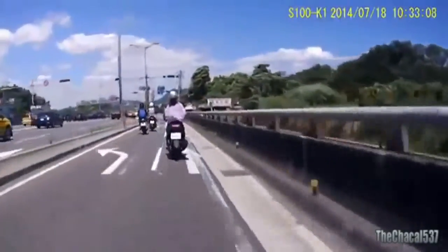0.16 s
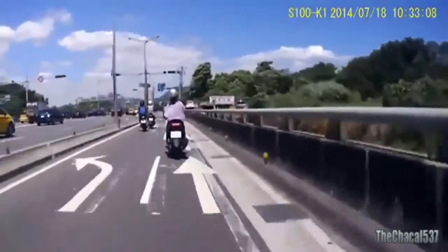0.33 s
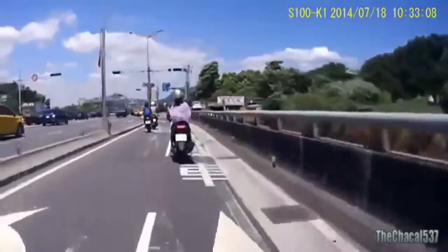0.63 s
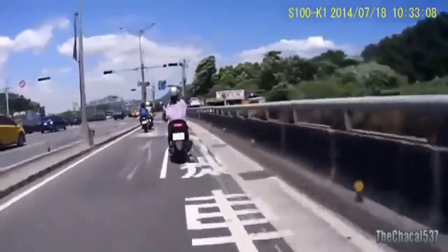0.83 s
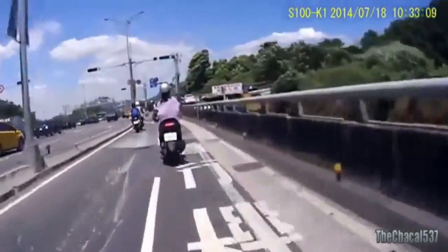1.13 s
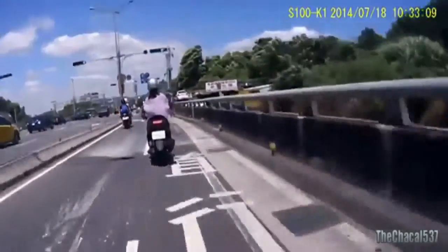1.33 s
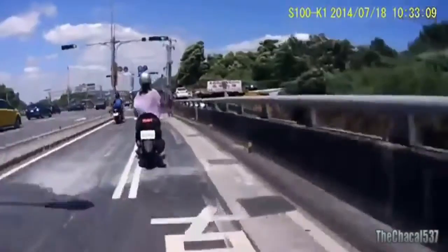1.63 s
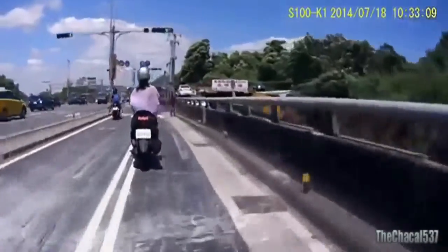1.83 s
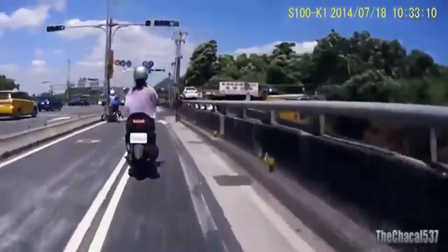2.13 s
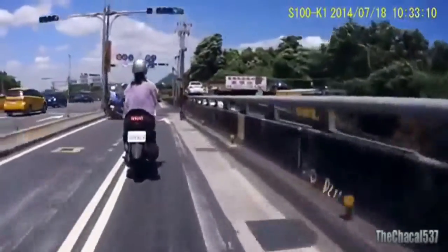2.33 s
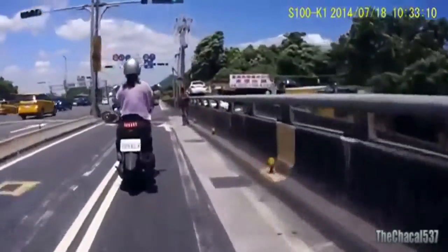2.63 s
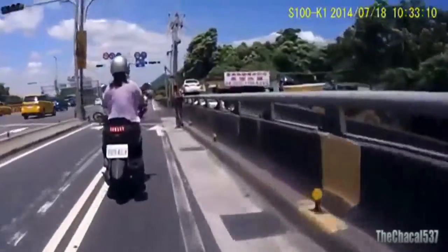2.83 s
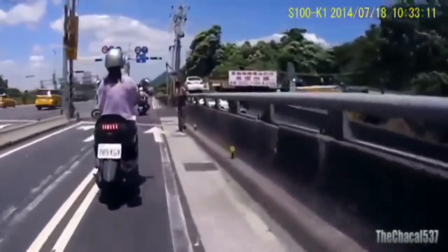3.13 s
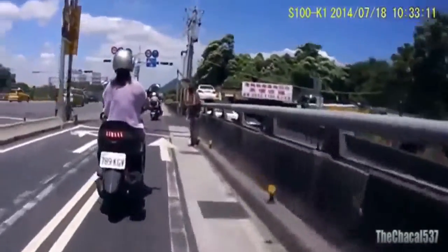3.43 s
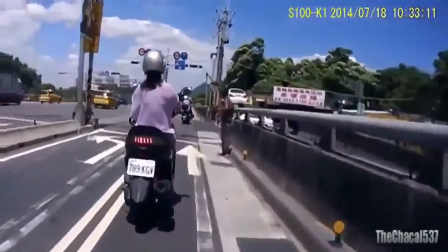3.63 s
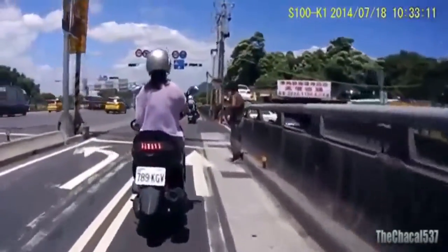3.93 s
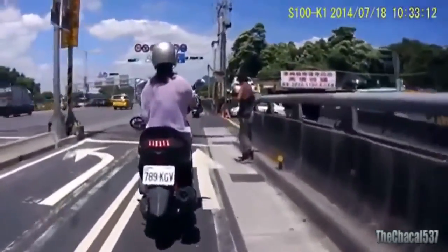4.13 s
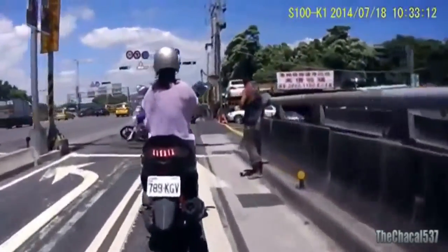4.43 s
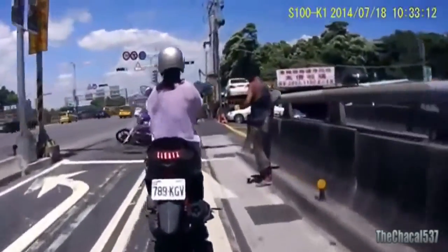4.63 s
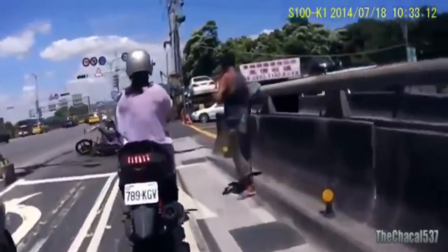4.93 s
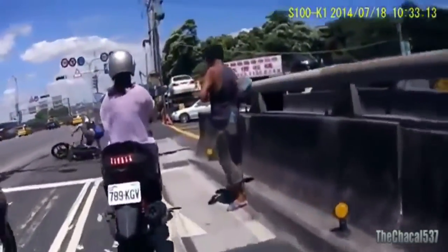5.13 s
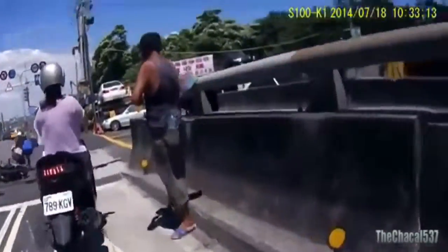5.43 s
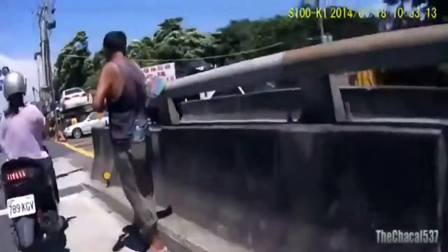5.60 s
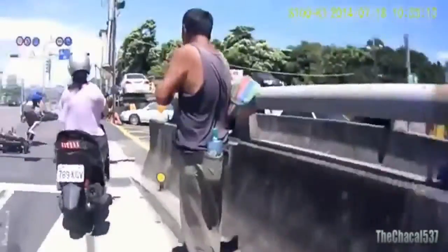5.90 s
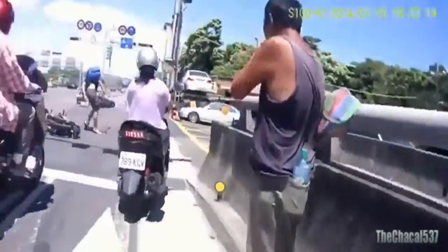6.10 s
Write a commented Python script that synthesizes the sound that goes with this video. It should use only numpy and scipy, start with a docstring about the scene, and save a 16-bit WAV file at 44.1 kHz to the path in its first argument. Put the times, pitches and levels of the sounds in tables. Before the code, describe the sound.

Heard close up from on board, a motor scooter coasts down a street with a loud, pulsing low hum that slightly overloads the microphone. Loose panels clack a few times at first and the body rumbles over the asphalt. The hum and whine drop as speed falls, a faint brake squeal ends up with one short chirp, and the engine idles.

```python
"""A motor scooter braking to a crawl

Heard from a camera on the coasting scooter, the exhaust hum beats against the drive shaft's drone,
and the gear whine sinks with road speed. Excited by the asphalt, the body booms, scrapes and knocks.
Friction makes the brake hiss, squeal and chirp once as the engine settles to idle.
The loudest hum overloads the microphone."""
import sys
import numpy as np
from scipy import signal
from scipy.fft import rfft, irfft
from scipy.io import wavfile
from scipy.ndimage import uniform_filter1d

SR = 44100
rng = np.random.default_rng(int(sys.argv[2]) if len(sys.argv) > 2 else 0)


def to_wav(s):
    """Save 16-bit WAV."""
    ch = np.atleast_2d(s).T  # columns
    pcm = np.round(np.clip(ch, -1, 1) * 32767)  # PCM
    wavfile.write(sys.argv[1], SR, pcm.astype(np.int16))


N = 276056
TIME = np.arange(N) / SR


def amp(db):
    """Amplitude ratio of a level in decibels."""
    return 10 ** (np.asarray(db) / 20)


def unit(x):
    """Normalisation to rms 1."""
    return x / np.sqrt(np.mean(x ** 2) + 1e-20)


def curve(rows):
    """Linear interpolation of (t, value) rows at every sample."""
    return np.interp(TIME, *np.transpose(rows))


def response(points, hz):
    """Frequency response in dB, interpolated over log frequency."""
    f, db = np.transpose(points)
    return np.interp(np.log(hz), np.log(f), db)


def wander(hz):
    """Random fluctuation: noise low-passed at hz; rms 1."""
    f = np.fft.rfftfreq(N, 1 / SR)
    return unit(irfft(rfft(rng.standard_normal(N)) / (1 + (f / hz) ** 4), N))


def colour(x, points):
    """Spectral shaping, with skirts that fall away beyond the end points; rms 1."""
    f = np.fft.rfftfreq(N, 1 / SR) + 1
    skirts = np.minimum(f / points[0][0], 1) ** 2 * np.minimum(points[-1][0] / f, 1) ** 2
    return unit(irfft(rfft(x) * skirts * amp(response(points, f)), N))


def angle(hz):
    """Phase as the time integral of frequency."""
    return 2 * np.pi * np.cumsum(hz) / SR


def add(mix, s, sound):
    """Superposition of a sound starting at time s."""
    part = mix[round(s * SR):][:len(sound)]
    part += sound[:len(part)]


def swells(rows):
    """Amplitude envelope: one tapered hump for each (t, duration, level) row."""
    level = np.zeros(N)
    for s, length, db in rows:
        add(level, s, amp(db) * signal.windows.tukey(int(length * SR), .7))
    return level


def resonate(x, hz, width_hz):
    """Resonance with a movable centre: shift down by hz, low-pass, shift back; rms 1."""
    carrier = np.exp(1j * angle(hz * np.ones(N)))
    pole = np.exp(-np.pi * width_hz / SR)
    baseband = signal.lfilter([(1 - pole) ** 2], [1, -2 * pole, pole * pole], x / carrier)
    return unit((carrier * baseband).real)


def partials(hz, phase, rows):
    """Forced vibration: each partial swells as it slides through its resonance."""
    return sum(amp(db) / (1 + (2 * (k * hz - centre) / width) ** 2) * np.sin(k * phase)
               for k, centre, width, db in rows)


def lowpass(x, hz):
    """Steep band limiting by a windowed-sinc filter."""
    return signal.oaconvolve(x, signal.firwin(255, hz, window=("kaiser", 8), fs=SR), "same")


# Rotation rate of the crank: t/s, f/Hz
CRANK_RATE = [(0.0, 93.51), (0.15, 94.55), (0.3, 85.6), (0.42, 79.85), (0.6, 76.95), (1.0, 75.62),
              (1.55, 73.4), (2.1, 69.8), (2.8, 64.47), (3.55, 55.3), (4.25, 51.7), (4.45, 48.9),
              (4.6, 43.8), (4.95, 39.3), (5.2, 37.0), (6.26, 32.3)]
# Transfer function of the body: f/Hz, gain/dB
BODY_RESPONSE = [(33, -31.5), (52, -24), (66, -15), (73, -9.5), (77, -1), (85, 1), (89.5, -5), (94, 1),
                 (97.5, 4), (103, -3.5), (106.5, -12.5), (114, -8.5), (122, -20), (150, -14), (190, -16)]
# Strong orders, before the body's gain: crank multiple, riding level/dB, idle level/dB
EXHAUST_ORDERS = [(1, -12, -16), (2, -12.5, -18.5)]
# Weak orders: crank multiple, riding level/dB, idle level/dB
WEAK_ORDERS = [(.5, -53, -60.5), (1.5, -32.5, -48), (2.5, -47.5, -42.5), (3, -49.5, -38),
               (3.5, -56.5, -41.5), (4, -53, -51), (5, -53.5, -54)]
def engine_hum(crank_hz):
    """Periodic excitation: a four-stroke single sounds at whole and half orders of the crank rate."""
    crank = angle(crank_hz)
    idle = np.clip((50 - crank_hz) / (50 - 36), 0, 1)  # rises from 0 at 50 Hz to 1 at 36 Hz
    hum = np.zeros(N)
    for k, riding_db, idle_db in EXHAUST_ORDERS:
        db = riding_db + (idle_db - riding_db) * idle + response(BODY_RESPONSE, k * crank_hz)
        hum += amp(db) * np.sin(k * crank)
    hum *= 1 + .08 * wander(25)
    for k, riding_db, idle_db in WEAK_ORDERS:
        db = riding_db + (idle_db - riding_db) * idle + 2.1 * wander(3.6)
        hum += amp(db) * np.sin(k * crank + .57 * wander(10) + rng.uniform(0, 2 * np.pi))
    return np.sqrt(2) * hum


# Spectrum of the clatter: f/Hz, relative level/dB
CLATTER_SPECTRUM = [(550, -33), (740, -12), (820, 6.5), (900, 0), (970, 2), (1060, -6.5), (1200, -17.5),
                    (1320, -18.5), (1420, -15), (1540, -28.5), (2000, -34.5)]
def engine_clatter(crank_hz):
    """Impact noise: valves and piston strike once a turn, more softly as the crank slows."""
    full_db, full_hz, db_per_octave = -41.5, 73.5, 10.5
    turns = angle(crank_hz) / (2 * np.pi)
    strokes = 1.3 + np.exp(-(turns % 1) / .14)
    clatter = colour(strokes * rng.standard_normal(N), CLATTER_SPECTRUM)
    db = full_db + db_per_octave * np.minimum(np.log2(crank_hz / full_hz), 0)
    return clatter * amp(db + 1.1 * wander(24))


# Rotation rate of the drive shaft, proportional to road speed: t/s, f/Hz
SHAFT_RATE = [(0.0, 97.62), (0.45, 96.52), (1.0, 92.5), (1.5, 87.16), (2.0, 79.75), (2.37, 70.29),
              (2.65, 62.7), (3.0, 52.55), (3.45, 39.26), (3.8, 33.84), (4.0, 31.93), (4.25, 29.15),
              (5.2, 16.0), (6.26, 10.0)]
# Overtones in body resonances: shaft multiple, resonance f/Hz, bandwidth/Hz, peak level/dB
SHAFT_PARTIALS = [(2, 140, 56, -33.5), (3, 190, 38, -42)]
CRUISE_HZ = 96  # shaft rate before slowing
def shaft_drone(shaft_hz):
    """Rotating unbalance: a force growing as speed squared drives a tone that beats with the exhaust."""
    phase = angle(shaft_hz)
    unbalance = (shaft_hz / CRUISE_HZ) ** 2 * amp(-18.5 + response(BODY_RESPONSE, shaft_hz))
    return np.sqrt(2) * (partials(shaft_hz, phase, SHAFT_PARTIALS) - unbalance * np.sin(phase))


# Strength of the whine at each pitch: f/Hz, level/dB
WHINE_RESPONSE = [(103, -48.5), (116, -23), (146, -25.5), (168, -34.5), (192, -52), (242, -30.5),
                  (273, -22), (292, -39), (328, -42.5), (350, -35.5), (378, -47.5)]
# Partials in body resonances: mesh multiple, resonance f/Hz, bandwidth/Hz, peak level/dB
GEAR_PARTIALS = [(.5, 131.9, 7.7, -22), (2, 260, 21, -37)]
def gear_whine(shaft_hz):
    """Gear meshing: a tone locked to the shaft, with phase and level modulation that grow with speed."""
    mesh_per_turn, jitter_rad, flutter_db = 3.86, .35, 2.2
    mesh_hz = mesh_per_turn * shaft_hz
    shaking = shaft_hz / CRUISE_HZ
    phase = angle(mesh_hz) + jitter_rad * shaking * wander(29)
    db = response(WHINE_RESPONSE, mesh_hz) + flutter_db * shaking * wander(22)
    return np.sqrt(2) * (amp(db) * np.sin(phase) + partials(mesh_hz, phase, GEAR_PARTIALS))


# Spectrum of the boom: f/Hz, relative level/dB
BOOM_SPECTRUM = [(20, -21), (40, -16), (60, -13.5), (82, -3), (99, 3.5), (108, -3.5), (120, 2.5),
                 (140, -11.5), (190, -24), (260, -36.5)]
# Envelope of the boom: t/s, level/dB
BOOM_LEVEL = [(0, -26), (1, -21), (2, -30), (2.7, -21), (3.8, -27.5), (4.8, -33), (6.26, -28.5)]
def body_boom():
    """Random excitation: the road shakes the body's low resonances."""
    return colour(rng.standard_normal(N), BOOM_SPECTRUM) * amp(curve(BOOM_LEVEL))


# Spectra of the road's roar and the air's hiss: f/Hz, relative level/dB
ROAR_SPECTRUM = [(120, -19.5), (190, -4.5), (230, 4), (270, 10), (310, -3.5), (350, 1), (385, -3.5),
                 (435, 2.5), (480, -7), (525, 0), (590, -12.5), (680, -7), (760, -19.5), (1200, -38)]
AIR_SPECTRUM = [(1150, -10.5), (1390, 2), (1540, -15), (1690, -1.5), (1870, -8), (2080, -2.5), (2400, -12),
                (2600, -20), (2860, -17), (3270, -30.5), (3650, -19.5), (4700, -20.5), (5000, -16),
                (5250, -23.5), (6500, -38.5)]
# Rough asphalt: t/s, duration/s, level/dB of the added roar relative to smooth road
ROUGH_STRETCHES = [(.03, 0.24, -3), (.7, 0.64, -7.5), (1.6, 0.75, -7.5), (2.7, .6, -12.5), (4.38, 0.14, -1)]
def road_and_air(shaft_hz):
    """Broadband rolling and flow noise: both are modulated by bumps and fall with road speed."""
    bumps, rough = wander(24), swells(ROUGH_STRETCHES)
    roar_db = np.interp(shaft_hz, [0, 57.5], [-52.5, -34.5])
    roar = colour(rng.standard_normal(N) * amp(2.1 * bumps), ROAR_SPECTRUM)
    hiss_db = np.interp(shaft_hz, [0, CRUISE_HZ], [-66, -51])
    hiss = colour(rng.standard_normal(N) * amp(1.6 * bumps + 1.8 * wander(300)), AIR_SPECTRUM)
    return roar * amp(roar_db) * (1 + rough) + hiss * amp(hiss_db) * (1 + .18 * rough)


# Ring of the transmission: t/s, duration/s, level/dB
RING_SWELLS = [(.3, 1.15, -50.5)]
def transmission_ring(shaft_hz):
    """Narrow-band noise: a thin ring whose centre frequency follows the shaft rate."""
    cycles_per_turn = 15.2
    ring = resonate(rng.standard_normal(N), cycles_per_turn * shaft_hz, width_hz=50)
    return ring * swells(RING_SWELLS)


# Scrapes over bumps: t/s, duration/s, level/dB
TRIM_SCRAPES = [(0.309, 0.13, -52), (.94, .05, -49.5), (1.019, 0.093, -54), (1.397, 0.056, -51)]
# Spectrum of a scrape: f/Hz, relative level/dB
SCRAPE_SPECTRUM = [(1800, -16.5), (2300, 3), (2650, -12.5), (3250, -26.5), (3750, -2.5), (4200, -22),
                   (4500, -13), (5300, -27.5)]
def trim_scrapes():
    """Sliding friction: loose plastic trim rubs in bursts of grainy noise."""
    friction = rng.standard_normal(N) * amp(2.7 * wander(200))
    return swells(TRIM_SCRAPES) * colour(friction, SCRAPE_SPECTRUM)


# Blows on the panels: t/s, low-mode level/dB, middle-mode level/dB, high-mode and snap level/dB
PANEL_BLOWS = [(.353, -39, -33, -41), (.619, -12.5, -21, -19.5), (.684, -15.5, -24, -33.5),
               (0.828, -17, -28, -30), (1.875, -37, -35.5, -51), (2.069, -33, -51, -39.5),
               (2.397, -26.5, -56, -32.5), (2.722, -26.5, -30, -42.5), (2.794, -26.5, -48, -51),
               (3.665, -37, -40, -46), (4.328, -39, -36, -53.5), (4.501, -37, -41, -35),
               (4.924, -35, -38.5, -43), (5.612, -36.5, -44, -51)]
# Panel modes: nominal f/Hz, relative level/dB, T60/s
PANEL_MODES = [(840, -5, 0.058), (924, -1, 0.039), (1170, -7.5, 0.023), (1350, -2.5, 0.0088),
               (1780, -4, 0.02), (1970, -2.5, 0.018), (2470, -5.5, 0.013), (4680, -11, 0.023)]
def panel_knocks():
    """Damped free vibration: each blow on a loose panel favours low, middle or high modes."""
    out, t = np.zeros(N), np.arange(SR // 16) / SR
    attack = 1 - np.exp(-t / .001)
    for s, low_db, mid_db, high_db in PANEL_BLOWS:
        ring = 0
        for hz, db, t60 in PANEL_MODES:
            blow_db = np.interp(hz, [1100, 1600, 2600, 3500], [low_db, mid_db, mid_db, high_db])
            cycles = hz * rng.uniform(.91, 1.03) * t + rng.random()
            ring += amp(blow_db + db - 60 * t / t60) * np.sin(2 * np.pi * cycles)
        snap = amp(high_db - 60 * t / .021) * rng.standard_normal(len(t))
        add(out, s, (ring + snap) * attack)
    return out


# Jolts of the frame: t/s, duration/s, level/dB
FRAME_JOLTS = [(2.77, 0.041, -37), (2.88, 0.22, -38.5), (3.05, 0.2, -35), (4.39, 0.12, -39),
               (5.085, 0.043, -31)]
# Spectrum of a jolt: f/Hz, relative level/dB
JOLT_SPECTRUM = [(130, -15), (270, 7.5), (350, 0.5), (440, 0), (540, -14), (700, -22.5)]
def frame_jolts():
    """Transient excitation: bumps shake dull bursts of noise from the frame."""
    return swells(FRAME_JOLTS) * colour(rng.standard_normal(N), JOLT_SPECTRUM)


# Pads rubbing the disc: t/s, duration/s, level/dB
PAD_RUBS = [(4.2, 0.57, -62), (4.52, 0.34, -56), (4.73, 0.86, -54)]
# Lower resonances of the disc: t/s, duration/s, f/Hz, level/dB
DISC_RINGS = [(4.419, .4, 2680, -65), (4.701, 0.9, 2140, -58.5)]
def brake_squeal():
    """Friction-driven resonance: the pads rub the disc into a hissy, wavering squeal and lower rings."""
    start_hz, sag_hz_per_s, sag_from_s = 4854, 300, 4.74
    friction = rng.standard_normal(N) * amp(2 * wander(50))
    squeal_hz = start_hz - sag_hz_per_s * np.maximum(TIME - sag_from_s, 0) + 130 * wander(22)
    out = resonate(friction, squeal_hz, width_hz=520) * swells(PAD_RUBS)
    for s, length, hz, db in DISC_RINGS:
        out += resonate(friction, hz, width_hz=220) * swells([(s, length, db)])
    return out


# Slips of the pads: t/s, duration/s, f/Hz, level/dB
PAD_SLIPS = [(5.089, 0.01147, 1031, -13.5), (5.1011, .0095, 987, -21.5)]
# Inharmonic partials of a slip: frequency ratio, relative level/dB
SLIP_PARTIALS = [(0.998, 2.5), (1.281, -13.5), (1.7, -17.5), (2.101, -27), (2.95, -32), (4.3, -37),
                 (4.751, -28.5)]
def brake_chirp():
    """Stick-slip: the pads catch twice, so close together that one chirp is heard."""
    out = np.zeros(N)
    for s, length, hz, db in PAD_SLIPS:
        t = np.arange(int(length * SR)) / SR
        tone = sum(amp(level) * np.sin(2 * np.pi * hz * k * t) for k, level in SLIP_PARTIALS)
        tone += amp(-20) * rng.standard_normal(len(t))
        add(out, s, amp(db) * tone * signal.windows.tukey(len(t), .4))
    return out


def scene():
    """Structure-borne sound: all sources superpose at the camera through the scooter's frame."""
    crank_hz, shaft_hz = curve(CRANK_RATE), curve(SHAFT_RATE)
    mix = engine_hum(crank_hz) + engine_clatter(crank_hz)
    mix += shaft_drone(shaft_hz) + gear_whine(shaft_hz)
    mix += body_boom() + road_and_air(shaft_hz) + transmission_ring(shaft_hz)
    mix += trim_scrapes() + panel_knocks() + frame_jolts()
    mix += brake_squeal() + brake_chirp()
    return mix[None]


# Carriers about which the recorder mirrors the sound: f/Hz, modulation depth/dB
MIRROR_CARRIERS = [(3900, -53), (7800, -62.5), (11700, -65.5), (15600, -68)]
def record(dry):
    """Saturation flattens the hum's peaks with a soft rasp; a narrow-band recorder adds faint images."""
    ceiling, band_hz, edge_hz = .45, 5400, 15800
    clipped = dry[0] / (1 + np.abs(dry[0] / ceiling) ** 14) ** (1 / 14)
    overload = uniform_filter1d((clipped / ceiling) ** 4, size=500)
    rasp_spectrum = [(1500, 9.5), (5000, -10), (6500, -16), (8500, -18.5), (11000, -24)]  # f/Hz, level/dB
    rasp = amp(-47) * overload * colour(rng.standard_normal(N), rasp_spectrum)
    passband = lowpass(clipped, band_hz)
    leakage = amp(-24.5) * (lowpass(clipped, 1.9 * band_hz) - passband)
    carriers = sum(amp(db) * np.cos(2 * np.pi * hz * TIME) for hz, db in MIRROR_CARRIERS)
    return lowpass((passband + leakage) * (1 + carriers) + rasp, edge_hz)[None]


dry = scene()
out = record(dry)
to_wav(out)
```